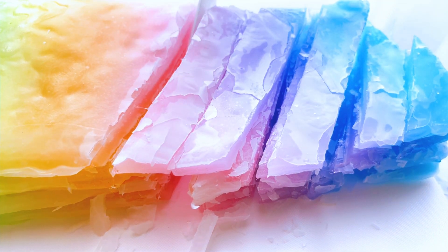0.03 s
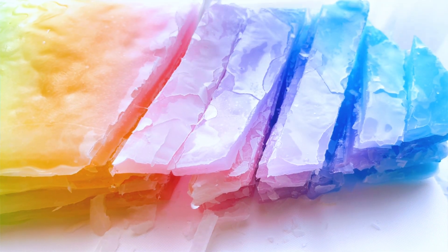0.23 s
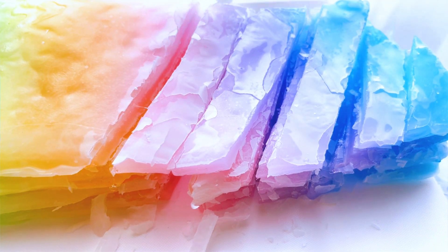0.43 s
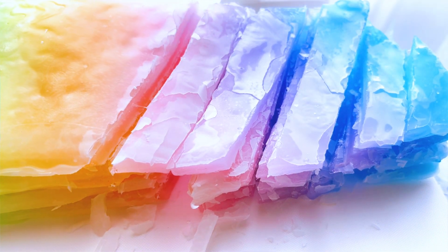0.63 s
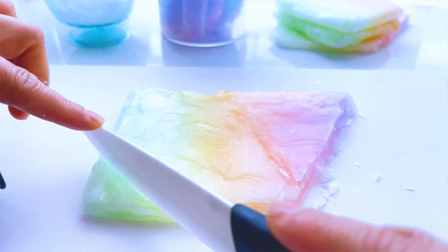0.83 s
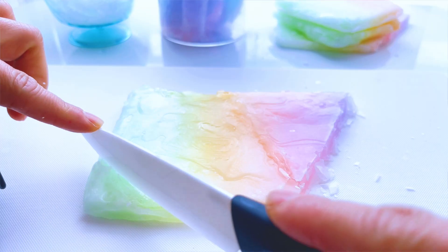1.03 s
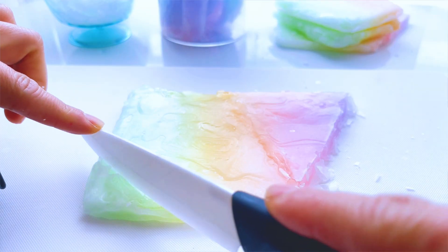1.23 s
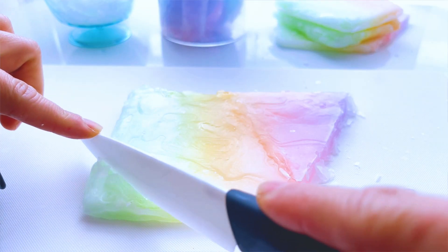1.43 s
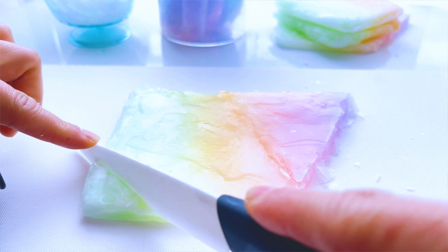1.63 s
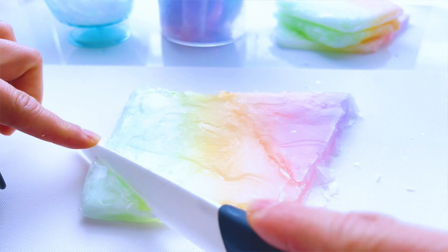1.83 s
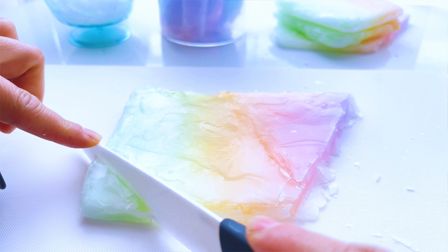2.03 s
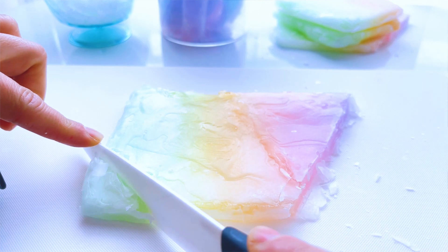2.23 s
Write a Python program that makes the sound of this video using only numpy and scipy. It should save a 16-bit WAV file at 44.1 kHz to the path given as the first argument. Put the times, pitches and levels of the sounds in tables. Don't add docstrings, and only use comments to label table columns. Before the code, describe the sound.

Brittle wax skin snapping and crumbling under a knife blade, very close, across two abruptly joined cuts

```python
import sys
import numpy as np
from scipy import signal
from scipy.fft import rfft, irfft, next_fast_len
from scipy.io import wavfile
from scipy.ndimage import uniform_filter1d

SR = 44100
rng = np.random.default_rng(int(sys.argv[2]) if len(sys.argv) > 2 else 0)


def to_wav(sig):
    pcm = np.clip(np.atleast_2d(sig), -1, 1) * 32767
    pcm = np.round(pcm).astype(np.int16)
    wavfile.write(sys.argv[1], SR, pcm.T)


def decibels_to_gain(level_db):
    exponent = np.asarray(level_db, float) / 20
    return 10 ** exponent


N = 100151
NOW = np.arange(N) / SR


def unit(x):
    return x / np.sqrt(np.mean(x ** 2) + 1e-20)


def along(points, hz):
    f, v = np.transpose(points)
    return np.interp(np.log(hz + 1), np.log(f + 1), v)


def filtered(x, response):
    m = next_fast_len(len(x) + 8192)
    return irfft(rfft(x, m) * response(np.fft.rfftfreq(m, 1 / SR)), m)[:len(x)]


def peak(f, hz, wide):
    return 1j * f * wide / (hz * hz - f * f + 1j * f * wide)


def add(track, s, sound):
    part = track[round((s + .0008) * SR):][:len(sound)]
    part += sound[:len(part)]


def grit(per_s):
    spread_db = 1.5
    draw = rng.random((2, N))
    grains = (draw[0] < per_s / SR) * decibels_to_gain(-spread_db * np.log(draw[1] + 1e-4))
    power = signal.lfilter([1], [1, -.93], np.minimum(grains, 6) ** 2)
    return unit(np.sqrt(power) * rng.standard_normal(N))


# start in seconds, peak level in dB, ring in Hz,
# brightness in dB.
SNAPS_FIRST = [(0.0151, -5.5, 2880, -14.5), (0.035, 10, 2570, -14.5), (0.121, -11.5, 2490, -7.5),
               (0.2744, -13, 2370, -19.5), (0.3114, 17.5, 3510, -15.5), (0.3234, 9.5, 1950, -29),
               (0.3309, 8, 2100, -21.5), (0.3449, 1.5, 940, -2.5), (0.3474, 16.5, 1177, -27.5),
               (0.3555, 2.5, 1200, -24), (0.3595, -6.5, 1100, -22), (0.366, 14.5, 1926, -24.5),
               (0.3715, 3, 2100, -18.5), (0.3765, -7, 6000, -4.5), (0.3795, -1, 2140, -18),
               (0.386, -4.5, 2340, -21.5), (0.3911, 5.5, 1410, -12), (0.3935, 5.5, 4940, -13),
               (0.4187, 15, 2270, -24.5), (0.4235, 14, 1243, -29.5), (0.4305, 3, 2500, -19.5),
               (0.4355, -3, 4100, -20.5), (0.4424, -3, 1720, -21.5), (0.4494, -4.5, 2200, -12.5),
               (0.4695, 6, 2670, -29.5), (0.4535, -5, 2300, -23), (0.4825, -4, 3580, -18),
               (0.527, -17, 800, -29), (0.437, -2.5, 544, -30.5), (0.458, -5, 505, -30),
               (0.5614, -24, 1807, -25.5), (0.7944, -37.5, 2263, -1), (0.8104, -40.5, 3800, 1.5),
               (0.866, -27.5, 1770, -23)]
SNAPS_SECOND = [(1.0285, 7, 1290, -8.5), (1.0288, 9.5, 2690, -18.5), (1.0816, 1, 1290, -13),
                (1.0405, -6.5, 3170, -13), (1.4622, -5.5, 2394, -3.5), (1.4645, -6.5, 2270, -11),
                (1.4722, -10.5, 1306, -30), (1.562, -15.5, 1350, -24.5), (1.6199, -6, 3090, -8),
                (1.7103, -14.5, 3000, -26.5), (1.7397, -17, 2680, -27), (1.759, -32, 2320, -22),
                (1.774, -26.5, 2700, -25), (1.7946, -23, 2840, -21), (1.8225, -18, 3000, -17),
                (1.833, -22.5, 2500, -19.5), (1.844, -25.5, 2720, -20.5), (1.8619, -20, 2910, -24),
                (1.8989, -27, 3300, -13.5), (2.0, -28.5, 2600, -21.5), (2.03, -32.5, 2600, -21.5),
                (2.058, -31, 2900, -15.5), (2.1028, -19, 3100, -10.5), (2.121, -26.5, 3000, -7),
                (2.166, -28.5, 2800, -15.5)]
# frequency in Hz, level in dB.
SNAP_COLOUR = [(350, -14.5), (1200, -7), (3000, -4), (5500, -5.5), (10000, -2.5), (12500, -16.5),
               (16000, -14.5)]


def snaps(rows):
    burst_t60, crumbs_t60, crumbs_db = .011, .066, -17
    ring_cycles, ring_db, ring_wide = 28.4, 3, .4
    out, t = np.zeros(N), np.arange(SR // 8) / SR
    fade = decibels_to_gain(-60 * t / burst_t60) + decibels_to_gain(crumbs_db - 60 * t / crumbs_t60)
    for s, db, hz, bright_db in rows:
        noise = rng.standard_normal((2, len(t)))

        def tone(f):
            octaves_up = np.clip(np.log2((f + 1) / 3000), 0, 1)
            return decibels_to_gain(along(SNAP_COLOUR, f) + (bright_db + 9.5) * octaves_up)

        burst = filtered(noise[0], tone) * fade
        rough = unit(filtered(noise[1], lambda f: peak(f, hz, ring_wide * hz)))
        ring = .32 * np.sin(2 * np.pi * hz * t) + .3 * rough
        ring = ring * decibels_to_gain(ring_db - 60 * t * hz / ring_cycles)
        add(out, s, decibels_to_gain(db - 3) * (burst + ring) * (1 - np.exp(-t / .0001)))
    return out


# time in seconds, level in dB.
CRUSH_FIRST = [(0, -37.5), (0.01, -23), (0.02, -20), (0.058, -27), (0.143, -36), (.2, -47), (.27, -38),
               (.305, -27.5), (.33, -27.5), (.45, -19.5), (0.521, -30.5), (.6, -44), (0.689, -46.5),
               (.73, -45), (0.778, -64), (.86, -64), (0.867, -52), (.89, -48.5)]
# time in seconds, level in dB, fineness of crumbs in dB.
CRUSH_SECOND = [(0.961, -76, -9), (1.025, -37, -12.5), (1.05, -37.5, -1.5), (1.109, -51, -2),
                (1.199, -83, -8.5), (1.27, -68, 1), (1.318, -71.5, 14), (1.39, -58, -2),
                (1.455, -37.5, -0.5), (1.468, -26.5, 9.5), (1.53, -27, 2.5), (1.631, -22.5, -6),
                (1.657, -31, -23), (1.789, -40, -6.5), (1.938, -39.5, 2.5), (2.002, -47.5, 2.5),
                (2.07, -53, 2.5), (2.2, -53, 6), (2.27, -62.5, 3.5)]
# frequency in Hz, level in dB per Hz.
WAX_FIRST = [(180, -40.5), (300, -3.5), (634, -14), (787, -12.5), (1030, -9), (1690, -6.5), (5160, -12),
             (10000, -9), (16000, -36)]
WAX_SECOND = [(180, -24), (300, -24), (593, -36.5), (749, 2.5), (994, -7.5), (1320, -1), (5200, -3.5),
              (6900, -6), (8500, -1), (11000, 0), (12000, -11.5), (16000, -11.5)]
# frequency in Hz, width in Hz, level in dB.
BLADE_FIRST = [(1980, 180, 6), (2600, 860, 8.5)]
BLADE_SECOND = [(780, 210, -11.5), (9870, 710, -3)]


def crush(curve, wax, blade):
    mix = grit(2200) + decibels_to_gain(-11.5) * rng.standard_normal(N)

    def colour(f):
        blade_gain = sum(decibels_to_gain(db) * abs(peak(f, hz, wide)) ** 2 for hz, wide, db in blade)
        return decibels_to_gain(along(wax, f)) * (1 + blade_gain)

    s, pressure_db, *fine_db = np.transpose(curve)
    body = unit(filtered(mix, colour))
    top = filtered(body, lambda f: 1 / (1 + (7000 / (f + 1)) ** 6))
    if fine_db:
        body = body + top * (decibels_to_gain(np.interp(NOW, s, fine_db[0])) - 1)
    return body * decibels_to_gain(np.interp(NOW, s, pressure_db))


# start in seconds, level in dB.
PUSHES_FIRST = [(.037, -20.5), (.298, -22.5), (.316, -10.5), (.336, 2.5), (.352, 2), (.372, 4),
                (.398, -1.5), (.421, 2), (.442, -12.5), (.47, -6.5), (.5, -15)]
PUSHES_SECOND = [
    (1.031, -1),
    (1.037, -5.5),
    (1.084, -8),
    (1.1, -17.5),
    (1.465, -9),
    (1.476, -17),
    (1.497, -23),
]
# start in seconds, level in dB.
LEANS = [
    (.022, -4.5),
    (.0365, -6),
    (.082, -22),
    (.277, -8.5),
]
# start in seconds, level in dB.
CHIP = [
    (.139, -16),
]
# start in seconds, level in dB.
LIFTS = [
    (.864, -10),
    (.877, -7.5),
]
# start in seconds, level in dB.
KNOCKS = [
    (1.614, -15),
    (1.634, -16),
    (1.6365, 1),
    (1.653, -33),
    (1.675, -22.5),
    (1.695, -17.5),
]
# frequency in Hz,
# level in dB, seconds to fade by 60 dB.
BOARD_FIRST = [(110.4, -8.5, 0.15), (155, -7.5, 0.18), (184.1, -2, 0.06), (218.1, 0, 0.26), (272, -9, 0.18),
               (430, -15.5, 0.027), (334.3, -11, 0.061), (600, -7.5, .05)]
BOARD_SECOND = [(81.4, -17.5, 0.16), (120.8, -6.5, 0.17), (171, -15, 0.15), (213.5, -4.5, .1),
                (268.1, -9.5, 0.14), (404.6, -6, 0.045), (782, 4, 0.036), (1290, 2.5, 0.043)]
SHARD = [(2680, 0.015, 0.033)]
HOLLOW = [(204.3, -1.5, 0.039), (302, -8, 0.047), (441, -2, 0.025), (590, -4.5, 0.026), (800, 1.5, 0.023),
          (842, -7, 0.029)]


def board(pushes, modes, contact_s, low_hz, rattle):
    t, ring = np.arange(SR // 2) / SR, 0
    for k, (hz, db, t60) in enumerate(modes):
        ring = ring + (-1) ** k * decibels_to_gain(db - 60 * t / t60) * np.sin(2 * np.pi * hz * t)
    force = rattle.copy()
    for s, db in pushes:
        bump = np.sin(np.pi * np.clip((NOW - s) / contact_s, 0, 1)) ** 2
        force += decibels_to_gain(db) * bump / (bump.sum() + 1e-9)
    thud = signal.fftconvolve(force, ring)[:N]
    return filtered(thud, lambda f: (1j * f / (low_hz + 1j * f)) ** 2)


# frequency in Hz, seconds to fade by 60 dB.
ROOM = [(300, 0.27), (2000, 0.17), (10000, 0.15)]


def room(x):
    hz, t, z = signal.stft(rng.standard_normal(SR // 2), SR, nperseg=256)
    tail = signal.istft(z * decibels_to_gain(-60 * t / along(ROOM, hz)[:, None]), SR, nperseg=256)[1]
    return signal.fftconvolve(np.pad(x, (200, 0)), tail / np.linalg.norm(tail))[:N]


# time in seconds, level in dB.
GRIP_FIRST = [(0, 0.5), (0.142, 0), (.175, -22.5), (.255, -10), (.272, 0.5), (.425, 0.5), (.45, -3),
              (.53, 3.5), (.58, -11), (.85, -16), (.86, -1.5)]
GRIP_SECOND = [(1.02, 4.5), (1.12, -5.5), (1.25, 0), (1.45, -4.5), (1.53, 2), (1.6, 0), (1.641, 0),
               (1.66, -5), (1.75, -3)]


def shot(rows, curve, wax, blade, thuds, grip_curve, rattle_db, wet_db):
    breaks, crumbs = snaps(rows), crush(curve, wax, blade)
    strength = np.sqrt(uniform_filter1d(crumbs ** 2, size=200) + 1e-12)
    shake = decibels_to_gain(rattle_db) * strength * rng.standard_normal(N)
    thud = sum(board(*each, shake * (k < 1)) for k, each in enumerate(thuds))
    grip = decibels_to_gain(np.interp(NOW, *np.transpose(grip_curve)))
    return breaks + crumbs + decibels_to_gain(-10) * room(breaks) + grip * (thud + decibels_to_gain(wet_db) * room(thud))


# start in seconds, peak level in dB.
TICKS = [(1.2357, -45), (1.2823, -39), (1.293, -30.5), (1.2972, -34.5), (1.3081, -25), (1.3196, -27),
         (1.3207, -27), (1.5478, -11.5), (1.3343, -27.5), (1.343, -29.5), (1.3499, -33.5), (1.359, -30),
         (1.4023, -20.5), (1.4053, -30), (1.4082, -27), (1.4330, -14), (1.4423, -18), (1.8277, -20.5),
         (2.0016, -35.5)]


def ticks():
    out, t = np.zeros(N), np.arange(SR // 50) / SR
    for s, db in TICKS:
        add(out, s, decibels_to_gain(db + 6 - 60 * t / .004) * rng.standard_normal(len(t)))
    return filtered(out, lambda f: peak(f, 10600, 3000) ** 2 + .5 * peak(f, 14000, 5000) ** 2)


# frequency in Hz, width in Hz.
TAP = [(1300, 2000), (2350, 1440)]


def tap():
    start_s, level_db, t60 = 1.4055, -20.5, .06
    out, t = np.zeros(N), np.arange(SR // 10) / SR
    hit = rng.standard_normal(len(t)) + 14 * (t == 0)
    add(out, start_s, decibels_to_gain(level_db - 60 * t / t60) * hit)

    def tip(f):
        tones = sum((-1) ** k * peak(f, hz, wide) ** 2 for k, (hz, wide) in enumerate(TAP))
        return 3 * tones / (1 + (f / 3400) ** 6) / (1 + (750 / (f + 1)) ** 4)

    return filtered(out, tip)


# time in seconds, level in dB.
RUB = [
    (.48, -50.5),
    (.53, -35),
    (.58, -37.5),
    (.62, -42.5),
    (.66, -44.5),
    (.695, -39.5),
    (.73, -55.5),
    (.77, -67),
    (.83, -74.5),
]
# time in seconds, level in dB.
SCRAPE = [
    (1.7, -61.5),
    (1.85, -41.5),
    (1.93, -32.5),
    (1.985, -37),
    (2.02, -46),
    (2.089, -51.5),
    (2.12, -45.5),
    (2.21, -49.5),
    (2.27, -67.5),
]


def scrape(curve, main_hz, other_hz, wide_hz, share):
    s, db = np.transpose(curve)
    main = filtered(grit(1800), lambda f: peak(f, main_hz, wide_hz) ** 2)
    other = filtered(grit(1500), lambda f: peak(f, other_hz, wide_hz))
    return unit(main + share * other) * decibels_to_gain(np.interp(NOW, s, db, left=-120))


# middle in seconds, peak level in dB, frequency in Hz.
SWAYS = [(0.048, -40, 35), (0.086, -26.5, 73), (.25, -28.5, 43.2), (0.364, -26, 61.3), (.42, -37, 24.6),
         (0.461, -14, 70.6), (1.105, -17, 114), (1.51, -18, 122), (1.576, -27, 106), (1.604, -28.5, 100),
         (1.671, -27.5, 77.5), (1.714, -36, 81.4)]


def sways():
    out = np.zeros(N)
    for s, db, hz in SWAYS:
        swell = np.exp(-((NOW - s) * hz / 1.3) ** 2)
        out += decibels_to_gain(db) * swell * np.sin(2 * np.pi * hz * (NOW - s))
    return out


# frequency in Hz, level in dB per Hz.
RUMBLE = [(15, -43), (25, 6.5), (175, -14), (242, -16), (531, -34), (575, -27), (5730, -44), (9320, -38.5),
          (16000, -50.5)]


def low_rumble():
    return decibels_to_gain(-52) * unit(filtered(rng.standard_normal(N), lambda f: decibels_to_gain(along(RUMBLE, f))))


def scene():
    change_s = .8908
    # pushes, tones, contact in seconds, bass limit in Hz
    thuds_first = [(PUSHES_FIRST, BOARD_FIRST, .002, 90), (LEANS, BOARD_FIRST[3:4], .003, 72),
                   (CHIP, SHARD, .00015, 72), (LIFTS, BOARD_FIRST[:3], .004, 72)]
    thuds_second = [(PUSHES_SECOND, BOARD_SECOND, .0015, 72), (KNOCKS, HOLLOW, .0008, 170)]
    first = shot(SNAPS_FIRST, CRUSH_FIRST, WAX_FIRST, BLADE_FIRST, thuds_first, GRIP_FIRST,
                 rattle_db=-27, wet_db=-13.5)
    second = shot(SNAPS_SECOND, CRUSH_SECOND, WAX_SECOND, BLADE_SECOND, thuds_second, GRIP_SECOND,
                  rattle_db=-39, wet_db=-9.0)
    first = first + scrape(RUB, main_hz=1782, other_hz=2520, wide_hz=350, share=.48)
    second = second + ticks() + tap()
    second = second + scrape(SCRAPE, main_hz=5390, other_hz=3254, wide_hz=1200, share=.63)
    rumble = low_rumble()
    shots = np.where(np.arange(N) < change_s * SR, first + 1.9 * rumble, second + rumble[::-1])
    return (sways() + shots)[None]


def roll_off(x):
    return signal.sosfilt(signal.butter(12, 16320, fs=SR, output="sos"), x)


def record(dry):
    top, hardness = 1.0, 20
    clipped = dry / (1 + np.abs(dry / top) ** hardness) ** (1 / hardness)
    return roll_off(clipped)


dry = scene()
out = record(dry)
to_wav(out)
```